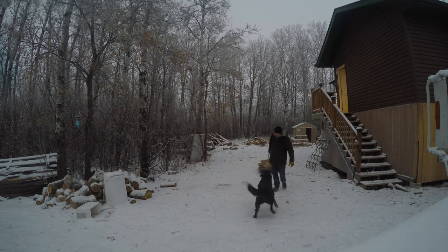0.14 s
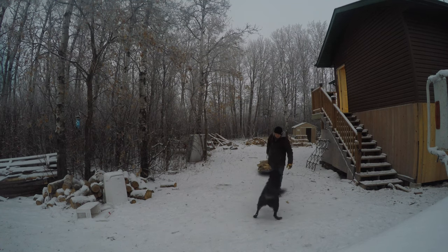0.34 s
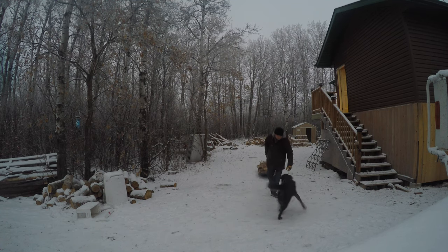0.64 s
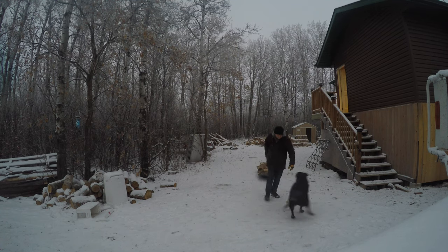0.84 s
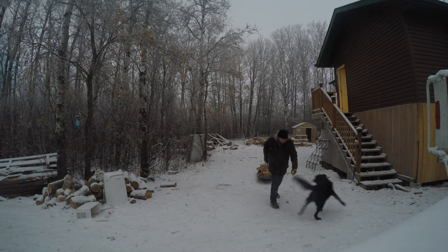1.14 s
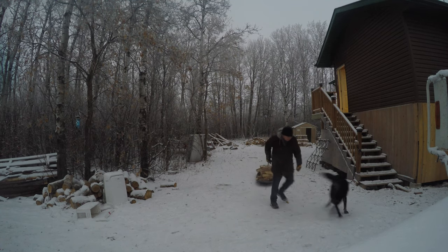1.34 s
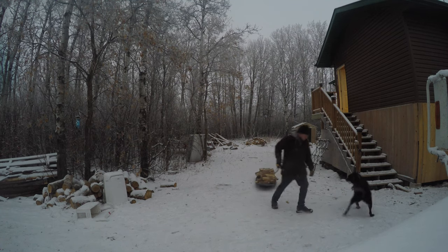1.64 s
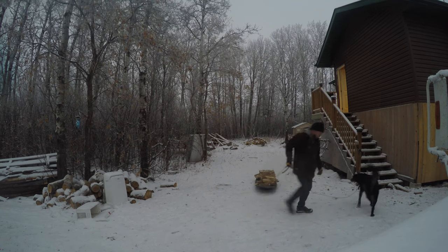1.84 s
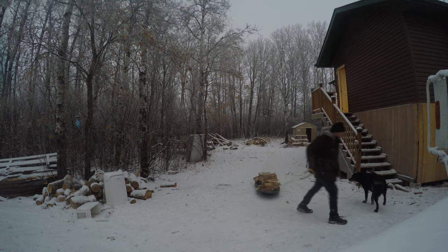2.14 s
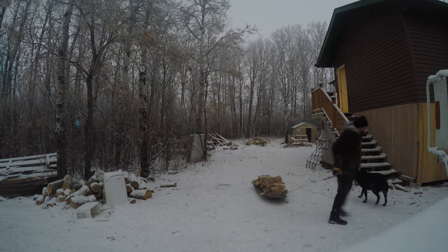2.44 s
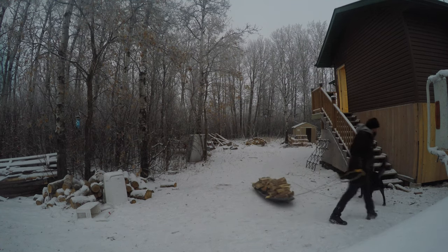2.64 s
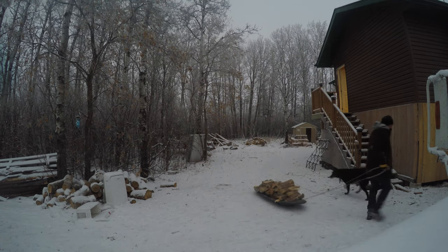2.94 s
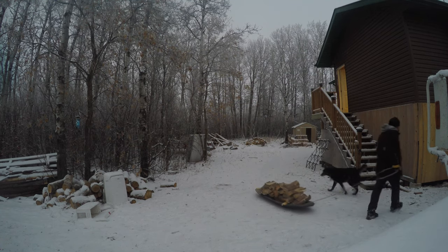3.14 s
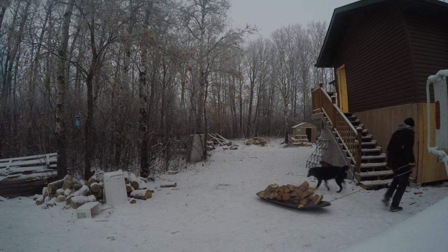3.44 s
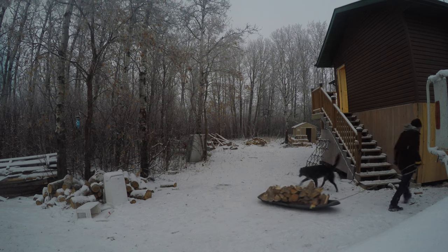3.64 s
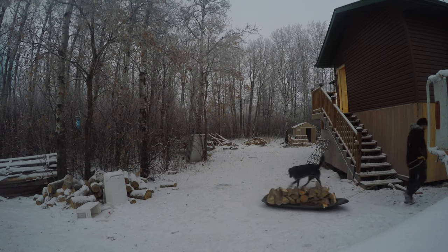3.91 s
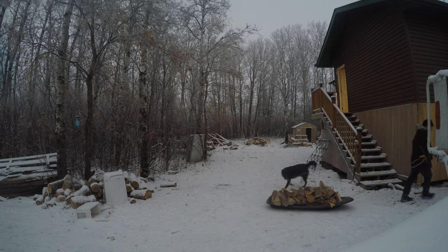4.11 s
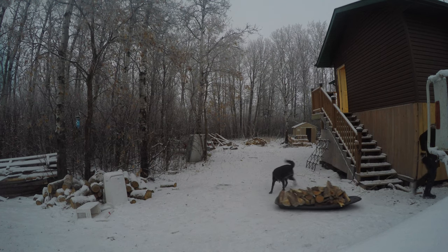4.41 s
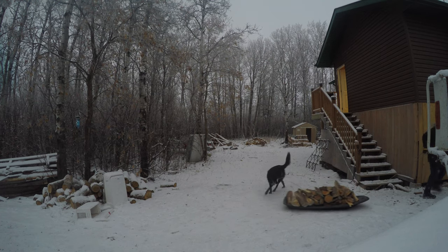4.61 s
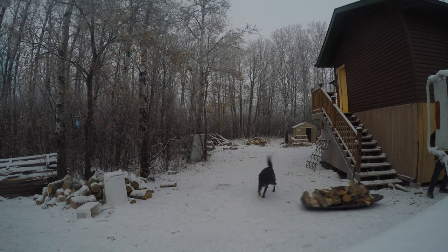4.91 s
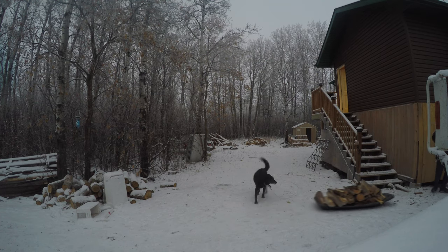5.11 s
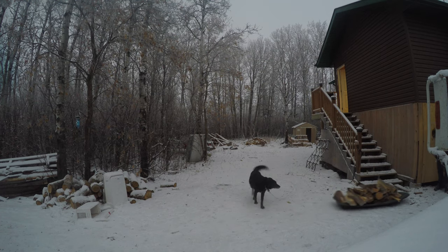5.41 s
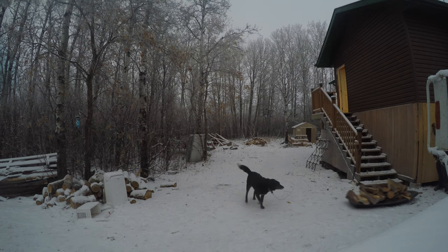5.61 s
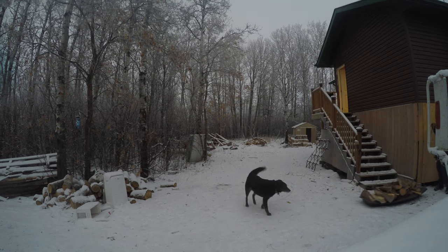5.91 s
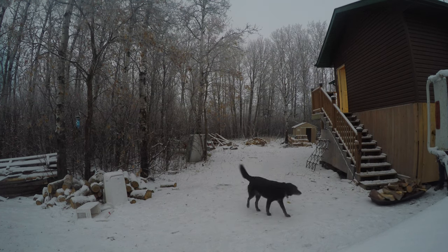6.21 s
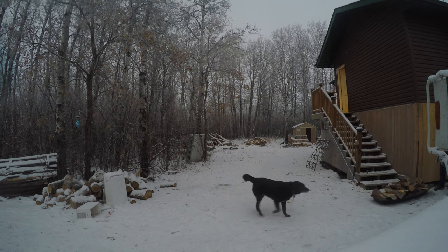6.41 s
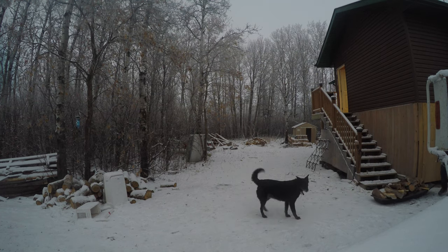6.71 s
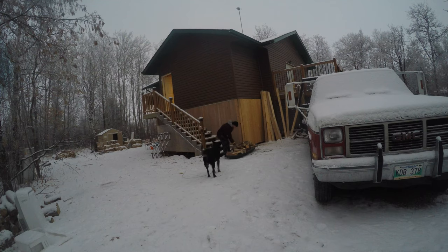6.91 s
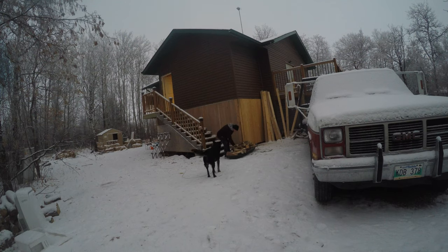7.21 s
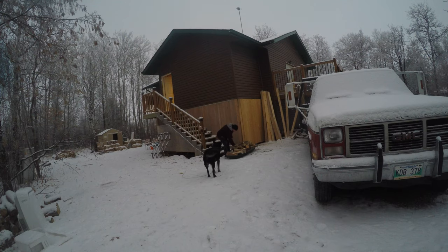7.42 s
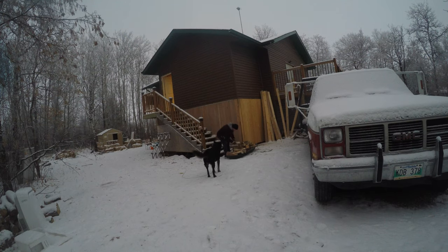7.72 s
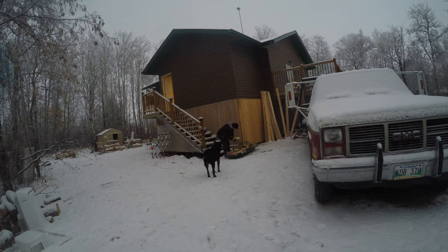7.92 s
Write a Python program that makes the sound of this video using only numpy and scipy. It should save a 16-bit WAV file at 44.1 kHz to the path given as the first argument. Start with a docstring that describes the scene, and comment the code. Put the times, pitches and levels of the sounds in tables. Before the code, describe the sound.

Light wind presses low on the microphone while a few muted thuds begin. A sled hull starts scraping over frozen snow, its hiss and rumble pulsing with each pull, logs clacking and rattling inside. It is strongest as it passes, eases slightly, then bangs several times in quick succession near the end. The hiss dies first, the drumming stops, and gusty wind flutter remains in the open yard, with slight scuffs.

```python
"""Firewood sled on snow

A plastic sled loaded with firewood is hauled over thin snow, past the listener and up to a stairway.
Snow hisses as noise under the hull, and frozen lumps drum on it as random clicks given the hull's colour.
Logs knock together, hardest as the sled pulls in: each knock is a ring, a wooden clack and a crunch.
Light wind, made of slowly varying noise, buffets the microphone; a faint echo follows the knocks.
"""
import sys
import numpy as np
from scipy import signal
from scipy.fft import rfft, irfft, next_fast_len
from scipy.io import wavfile
from scipy.ndimage import uniform_filter1d

SR = 44100
rng = np.random.default_rng(int(sys.argv[2]) if len(sys.argv) > 2 else 0)


def digitize_waveform(pressure):
    """Quantize a signal to 16-bit integers and store it at the path in sys.argv[1].

    Rows of a 2-D input are taken as channels; values are limited to [-1, 1].
    """
    field = np.atleast_2d(pressure).T
    bounded = np.clip(field, -1, 1)
    quanta = np.round(bounded * 32767).astype(np.int16)
    wavfile.write(sys.argv[1], SR, quanta)


N = 355134
TIME = np.arange(N) / SR

# All "relative" levels and spectra are adjusted further where they are used.

# still air of the yard: (frequency [Hz], relative level [dB per Hz])
AIR_SPECTRUM = [(120, -34), (200, -7.5), (326, -9.5), (427, -12), (671, -12.5), (818, -13.5), (1050, -23),
                (1690, -23), (1910, -23), (4390, -25), (9380, -31.5), (12300, -33.5), (15000, -39)]
AIR_DB = -63
# strength of the breeze: (time [s], relative rumble [dB], relative flutter of small eddies [dB])
WIND_STRENGTH = [(0.0, -42, -56.5), (0.47, -41.5, -49), (0.54, -47, -67), (0.69, -45.5, -73),
                 (1.05, -41.5, -47), (1.14, -49, -61), (1.5, -36, -48), (1.77, -46.5, -53), (2.4, -38, -52),
                 (3.11, -39, -51), (3.27, -47.5, -56), (4.06, -42.5, -72.5), (4.17, -37.5, -48.5),
                 (5.13, -38, -50.5), (6.17, -42.5, -39.5), (6.37, -50, -71), (6.43, -41, -57),
                 (6.73, -51.5, -58.5), (6.88, -54, -46), (6.96, -32, -50), (7.08, -34.5, -50.5),
                 (7.15, -39, -54.5), (7.36, -35.5, -49.5), (7.46, -33, -39), (7.55, -35.5, -49),
                 (7.62, -37, -54), (7.71, -38, -47), (7.78, -39, -39.5), (7.83, -50, -49), (7.91, -38, -51),
                 (8.03, -44.5, -62.5), (8.05, -63, -54)]
# large eddies on the microphone: (frequency [Hz], relative level [dB per Hz])
RUMBLE_SPECTRUM = [(8, -12), (18, -7), (27, 2), (45, 0), (62, -7.5), (90, -17.5), (200, -53), (600, -109)]
# small eddies on the microphone: (frequency [Hz], relative level [dB per Hz])
FLUTTER_SPECTRUM = [(35, -35.5), (70, 1), (100, -6.5), (150, -11.5), (230, -21), (400, -42.5), (1500, -81)]
# sharp gusts: (start [s], length [s], push [dB], rate of shaking [Hz], relative rasp [dB])
BUFFETS = [(4.244, 0.073, -24.5, 36.5, -67), (5.325, 0.041, -26, 45.5, -61), (5.438, 0.055, -28, 45, -75),
           (6.425, 0.057, -31, 41.6, -70), (6.804, 0.0587, -33, 48.5, -75), (7.003, 0.072, -24, 45, -55),
           (7.407, 0.0936, -20.5, 45, -41), (7.642, 0.07, -20, 37, -71), (7.746, 0.08, -34, 69, -65.5)]
# rasp of a sharp gust: (frequency [Hz], relative level [dB per Hz])
RASP_SPECTRUM = [(60, 2.5), (150, 0), (300, 0), (800, -5), (1100, -24), (3200, -26), (4200, -38),
                 (15000, -58)]

# moments when the sled is ahead, passing, and off to the side: (time [s])
BEARING_TIMES = [2.3, 4.0, 5.1]
# colour of snow and wood with the sled ahead: (frequency [Hz], relative level [dB per Hz])
COLOUR_AHEAD = [(400, -1), (1100, -1.5), (1950, -7), (2450, -2.5), (2900, -2), (3150, -6.5), (3500, -12),
                (3850, -5.5), (4350, -8.5), (4720, 0), (5000, -4), (5450, -13), (5850, -9), (6800, -11),
                (7400, -18), (8500, -21.5), (10000, -20.5), (12100, -24.5), (13200, -23), (15500, -23)]
# the same with the sled passing: (frequency [Hz], relative level [dB per Hz])
COLOUR_PASSING = [(400, 4.5), (1100, 5), (1950, -2), (2350, 2.5), (2850, 3.5), (3300, -8.5), (3950, 0),
                  (4350, -3.5), (4720, 4), (5000, -1.5), (5450, -13), (5850, -11.5), (6800, -10),
                  (7400, -16.5), (8500, -22.5), (9700, -20), (11000, -23.5), (13400, -19.5), (14200, -16),
                  (15200, -26)]
# the same with the sled off to the side: (frequency [Hz], relative level [dB per Hz])
COLOUR_ASIDE = [(400, -1), (1050, 10), (1400, 2), (1680, -2.5), (2000, 1), (2600, 2.5), (2950, -0.5),
                (3300, 2), (3650, 0.5), (4400, -2), (4850, 3.5), (5500, -3.5), (5950, -4), (7000, -10),
                (7500, -8), (8200, -15), (9200, -8), (10800, -13), (15000, -12.5)]

# pull on the sled, strongest as it passes: (time [s], relative drumming [dB], relative hiss [dB])
DRAG = [(0.0, -52, -67), (1.36, -47.5, -60), (1.62, -47, -56.5), (1.86, -46.5, -56.5), (2.0, -42.5, -58),
        (2.33, -45, -55), (2.61, -42.5, -52), (2.87, -41, -56.5), (3.05, -44.5, -54.5), (3.27, -42, -51.5),
        (3.64, -39, -54), (3.9, -42, -53), (4.23, -44, -59), (4.43, -45.5, -58.5), (4.59, -41, -57),
        (4.94, -46.5, -57), (5.5, -43, -61), (5.68, -39, -61), (5.86, -42, -62.5), (6.07, -43.5, -63.5),
        (6.25, -43.5, -64.5), (6.49, -50.5, -64), (6.6, -54, -69)]
# hull under the lumps: (frequency [Hz], relative level [dB per Hz])
HULL_SPECTRUM = [(50, -24), (110, -2.5), (190, -3), (290, 1), (400, 2), (560, 1.5), (720, 2), (850, -4.5),
                 (980, -13.5), (1150, -26.5), (1500, -28), (2400, -33.5), (5000, -82)]
# panels of the hull that take turns riding the lumps: (centre frequency [Hz])
PANELS = [130, 220, 330, 450, 580, 720, 900, 1300]
# crust breaking, before the colour of its direction: (frequency [Hz], relative level [dB per Hz])
CRUST_SPECTRUM = [(600, -2.5), (1500, 8.5), (2700, 5.5), (4600, 5), (6500, -2), (9000, 4), (15000, 1)]
# the sled surges with each tug on the rope: moment of one tug, time between tugs (both in s)
TUG_AT_S, TUG_EVERY_S = 2.427, 0.378
# high sheens in the hiss: (peak time [s], time to fade by 10 dB, sign unused [s], level [dB],
# centre at the peak [Hz], sinking [Hz per s], spread to each side [Hz])
SHEENS = [(1.6, 1.5, -76, 13670, 1, 900), (2.55, -0.75, -83, 13700, -0.5, 1000),
          (3.4, 0.15, -77, 14200, -1.5, 500), (5.1, 0.6, -73, 9330, 690, 1100)]
# groans before the last heavy bump and while slowing:
# (start [s], length [s], first pitch [Hz], last pitch [Hz], relative level [dB])
GROANS = [(5.703, 0.038, 338, 679, -33), (6.23, 0.131, 180, 166.3, -35.5)]
# hull ploughing through crust: (start [s], length [s], grind [dB], grit [dB])
SCRAPES = [(1.546, 0.019, -43, -54), (1.725, 0.034, -48.5, -54), (2.244, 0.072, -40, -59),
           (2.387, 0.017, -41, -47), (2.41, 0.061, -40, -51), (2.542, 0.0454, -39, -49),
           (2.791, 0.09, -42, -59), (3.535, 0.049, -36, -52), (3.609, 0.019, -35, -52),
           (3.753, 0.04, -40.5, -47), (3.901, 0.079, -40.5, -47.5), (4.603, 0.12, -52, -64),
           (5.553, 0.033, -42, -60.5), (5.755, 0.16, -41.5, -60), (6.393, 0.019, -45.5, -66)]
# boots scuffing snow beside the resting sled: (start [s], length [s], grind [dB], grit [dB])
SCUFFS = [(7.033, 0.06, -59, -65.5), (7.347, 0.04, -70, -67.5), (7.805, 0.03, -64, -67)]

# logs knocking in the sled: (start [s], relative thud [dB], relative clack [dB], relative crunch [dB],
# base ring time, multiplied per mode [s], hull pitch [factor],
# bass lift per octave downward [dB], log pitch [factor])
KNOCKS = [(0.300,-31,-67,-72,0.084,0.69,6,1), (0.616,-48,-55.5,-70,0.039,0.97,0,0.75),
          (1.090,-27.5,-69,-70,.04,1.015,2,0.64), (1.472,-31,-48,-59,.039,1.27,4.5,0.81),
          (1.560,-26,-59,-52,.097,1.116,-1,1), (1.567,-29,-52,-37.5,.039,1.044,-14.5,.95),
          (1.640,-28,-55,-63,0.03,1.04,-5,1), (1.664,-25.5,-56,-61,0.031,1.01,-15,0.44),
          (1.724,-25,-47,-32,.025,0.935,-1,1), (2.082,-30,-58,-65,0.044,1.07,-12,.6),
          (2.123,-28.5,-51,-52,0.035,1.06,-6,0.7), (2.229,-23,-49,-46.5,0.062,0.67,-1.5,1.05),
          (2.237,-24,-48,-58,0.033,0.552,-3,1.27), (2.433,-25,-52,-36,.047,0.83,-3,1.15),
          (2.469,-19,-50,-58,0.031,0.89,3,0.57), (2.496,-24.5,-61,-61,0.0167,1,5,1),
          (2.502,-21.5,-53,-58,0.028,1.04,2.5,0.56), (2.594,-21,-62.5,-65,0.016,1,3,0.85),
          (2.703,-23.5,-43,-39,0.064,1.1,2,0.85), (2.811,-28.5,-48,-56,0.36,1.011,-10.5,0.94),
          (2.911,-24.5,-61,-65,.04,0.98,8,1), (3.085,-32,-45,-47,.03,1.3,-3,1.1),
          (3.255,-25.5,-62,-61.5,0.045,1.06,-2,0.65), (3.27,-27,-62,-62,0.042,0.98,2,1.1),
          (3.419,-30,-45,-52,0.106,1.13,-15,1.15), (3.456,-43,-46,-41,.04,0.91,-5,1.2),
          (3.509,-25.5,-40.5,-37.5,0.12,1.03,-13.5,0.69), (3.609,-12.5,-37,-64,0.03,1.02,-7,1.08),
          (3.626,-25,-54,-64,0.019,1.03,6,.6), (3.643,-29,-60,-64,0.0186,0.92,2,1.1),
          (3.712,-25.5,-42,-36,.022,1.154,7,1.02), (3.800,-25,-43,-43,0.082,1.08,-8.5,1),
          (3.950,-24.5,-50,-47,.1,1.04,-7,1.23), (4.005,-22,-64,-67,0.14,0.86,-6,1.05),
          (4.027,-23,-58,-54,.08,0.99,0,.7), (4.061,-22,-41,-28.5,.023,0.99,-8,1.06),
          (4.621,-26,-57,-60.5,.21,0.91,9.5,1), (4.942,-25.5,-62,-67,0.095,1,6,1.15),
          (5.169,-23.5,-52,-58,.06,.82,-5,0.78), (5.479,-18.5,-51,-61,0.087,0.99,-1.5,.62),
          (5.515,-17,-43,-61,0.046,1.142,6,0.66), (5.531,-23,-51.5,-62,0.033,0.78,0,0.97),
          (5.550,-13,-36,-43,.036,1.12,0.5,.97), (5.566,-20.5,-61,-64,0.12,1.06,11.5,0.97),
          (5.638,-21.5,-64,-68,.06,.97,0,1.09), (5.740,-16.5,-68,-68,0.052,1.01,6.5,0.89),
          (5.756,-11,-38,-36,0.065,1.11,4,0.75), (5.772,-12.5,-45,-55,0.057,0.7,4,0.58),
          (5.779,-16.5,-55,-68,0.068,.92,17,1), (5.790,-21,-64,-68,0.12,.36,4,1),
          (6.035,-18.5,-51,-49,0.04,.97,1,0.89), (6.124,-21,-48,-55,0.158,1,10,0.95),
          (6.396,-25.5,-65,-68,0.024,0.92,6,0.71), (6.424,-30,-79,-74,0.086,.85,6,1),
          (6.611,-39,-78,-81,.12,1.12,8,1), (6.804,-38,-72,-74,0.055,1,8,1.04),
          (6.887,-40,-69.5,-74,0.0383,0.92,-5,1), (7.077,-35,-65,-70,0.061,1,9,1)]
# loaded hull when struck: (base frequency [Hz], relative level [dB], share of the ring time [factor])
LOAD_MODES = [(205.7, -9.5, 1.68), (270.6, -4.5, 1.24), (377, -8, 3.3), (494, -6, 1.7), (557, 6.5, 0.49),
              (702, 2.5, 2), (793.3, 1, 1.03), (893, -15.5, 0.73), (1063.4, -24.5, 2.8), (1372, -32.5, 4.7)]
# a split log: (base frequency [Hz], relative level [dB], time to fade by 60 dB [s])
LOG_MODES = [(1381, 0, 0.123), (2035, 7, 0.17), (2422, 14, 0.034), (2700, 1, 0.042), (3345, 7.5, 0.053),
             (3820, -3, 0.022)]
# wood on wood, before the colour of its direction: (frequency [Hz], relative level [dB per Hz])
CLACK_SPECTRUM = [(500, 0), (1200, 6), (2600, 5.5), (3500, -2.5), (4700, -11), (6000, 4.5), (8500, -15.5),
                  (15000, -20)]
# flexing hull: pitch (Hz), level added to the table's thud level (dB), time to fade by 60 dB (s)
FLEX_HZ, FLEX_DB, FLEX_T60 = 113, -24.5, 0.15
# top of the knocks is dulled above MUFFLE_HZ; the whole sound ends near EDGE_HZ
MUFFLE_HZ, EDGE_HZ = 9000, 15350


def amp(db):
    """Turns decibels into gain."""
    return 10 ** (np.asarray(db) / 20)


def unit(x):
    """Scales a sound to an rms (average strength) of 1."""
    return x / np.sqrt(np.mean(x ** 2) + 1e-20)


def curve(rows, column):
    """Reads gain over time from a table column in dB."""
    rows = np.asarray(rows)
    return amp(np.interp(TIME, rows[:, 0], rows[:, column]))


def add(mix, s, sound):
    """Mixes a sound in, starting at time s, and cuts off what runs past the end."""
    part = mix[max(round(s * SR), 0):][:len(sound)]
    part += sound[:len(part)]


def colour(x, spectrum):
    """Filters without any sound before its cause (minimum phase); the result has rms 1."""
    size = next_fast_len(len(x) + 8192)
    hz, db = np.transpose(spectrum)
    all_hz = abs(np.fft.fftfreq(size, 1 / SR))
    log_gain = np.log(amp(np.interp(np.log(all_hz + 1), np.log(hz), db)))
    response = np.exp(np.conj(signal.hilbert(log_gain)))[:size // 2 + 1]
    return unit(irfft(rfft(x, size) * response, size)[:len(x)])


def noise(spectrum, size=N):
    """Makes coloured noise of rms 1."""
    return colour(rng.standard_normal(size), spectrum)


def wander(rate_hz):
    """Makes a smooth random signal of rms 1, mostly slower than the given rate."""
    hz = np.fft.rfftfreq(N, 1 / SR)
    smooth = rfft(rng.standard_normal(N)) / (1 + (hz / rate_hz) ** 4)
    return unit(irfft(smooth, N))


def grains(per_s, spread_db):
    """Makes random clicks of rms 1, a few larger than the rest."""
    size = amp(spread_db * np.minimum(rng.exponential(1, N), 4))
    happens = rng.random(N) < per_s / SR
    return unit(size * rng.choice([-1, 1], N) * happens)


def ring(t, hz, db, t60, scatter=0.6):
    """Sums dying tones set off by one blow, with random pitch and phase; the peak is 1."""
    detune, phase = rng.uniform(-1.11, 1, (2, len(hz), 1))
    decay = amp(db - 60 * t / t60)
    tones = np.sin(2 * np.pi * hz * (1 + 0.04 * detune) * t + np.pi * scatter * phase)
    x = (decay * tones).sum(0)
    return x / abs(x).max()


def arriving(x):
    """Gives snow and wood a colour that turns with the direction from which they arrive."""
    out = np.zeros(N)
    for share_row, spectrum in zip(np.eye(3), (COLOUR_AHEAD, COLOUR_PASSING, COLOUR_ASIDE)):
        out += np.interp(TIME, BEARING_TIMES, share_row) * colour(x, spectrum)
    return np.std(x) * out


def still_air():
    """Steady, quiet noise of the still yard."""
    return amp(AIR_DB) * noise(AIR_SPECTRUM)


def eddies(spectrum):
    """Turbulent pressure as noise, with its strength evened out over short stretches."""
    x = noise(spectrum)
    local_power = uniform_filter1d(x ** 2, size=5000)
    return unit(x / np.sqrt(local_power + 0.043))


def wind(rumble_db=1.5, flutter_db=-1.5, gusty_db=2.5, rasp_floor=0.54):
    """Eddies press on the microphone in quick surges; sharp gusts shake it and rasp at each crest."""
    surge = unit(amp(gusty_db * wander(rate_hz=8.5)))
    rumble = eddies(RUMBLE_SPECTRUM) * curve(WIND_STRENGTH, column=1) * amp(rumble_db)
    flutter = eddies(FLUTTER_SPECTRUM) * curve(WIND_STRENGTH, column=2) * amp(flutter_db)
    out = surge * (rumble + flutter)
    for s, length, push_db, hz, rasp_db in BUFFETS:
        t = np.arange(-length / 2, length / 2, 1 / SR)
        push = np.cos(2 * np.pi * hz * t)
        rasp = noise(RASP_SPECTRUM, size=len(t)) * (rasp_floor + np.maximum(push, 0) ** 2)
        add(out, s, np.hanning(len(t)) * (amp(push_db) * push + amp(rasp_db) * rasp))
    return out


def yard(x, echo_db=-15, t60=0.53, build_up_s=0.037):
    """The house wall and the trees scatter a faint tail of fading noise."""
    t = np.arange(SR // 2) / SR
    tail = rng.standard_normal(len(t)) * amp(-60 * t / t60) * np.minimum(t / build_up_s, 1)
    return x + amp(echo_db) * signal.fftconvolve(x, tail / np.linalg.norm(tail))[:N]


def sheen():
    """Soft, high noise bands in the hiss come and go as the sled turns, drifting in pitch."""
    out = np.zeros(N)
    for s, fade_s, db, hz, sink, width_hz in SHEENS:
        since = TIME - s
        angle = 2 * np.pi * np.cumsum(hz - sink * since) / SR
        # two random signals on a cosine and a sine make a band of noise around the pitch
        band = wander(width_hz) * np.cos(angle) + wander(width_hz) * np.sin(angle)
        out += band * amp(db - 10 * (since / fade_s) ** 2)
    return out


def scrapes(skew=0.79, gritty=0.68):
    """Hull or boot ploughs through crust: a low grind and a gritty rasp swell and fade together."""
    grind, grit = np.zeros((2, N))
    for s, length, grind_db, grit_db in SCRAPES + SCUFFS:
        swell = np.sin(np.pi * np.linspace(0, 1, int(length * SR)) ** skew)
        add(grind, s, amp(grind_db) * swell)
        add(grit, s, amp(grit_db) * swell)
    crystals = rng.standard_normal(N) + gritty * grains(per_s=400, spread_db=2.5)
    return grind * noise(HULL_SPECTRUM) + grit * arriving(colour(crystals, CRUST_SPECTRUM))


def groans(rough=0.63, jitter=0.066):
    """Plastic sticks and slips on packed snow: a gliding tone, uneven in pitch and strength."""
    out = np.zeros(N)
    waver = 1 + jitter * wander(rate_hz=150)
    for s, length, first_hz, last_hz, db in GROANS:
        hz = np.linspace(first_hz, last_hz, int(length * SR))
        turns = np.cumsum(hz * waver[round(s * SR):][:len(hz)]) / SR
        add(out, s, amp(db) * np.hanning(len(hz)) * np.sin(2 * np.pi * turns))
    return out * (1 + rough * wander(rate_hz=53))


def jostle(jostle_db=-14, crackle_db=-7, crackle_t60=0.015, t60=0.31):
    """The load taps and the crust crackles at random, as strongly as the drag allows."""
    t = np.arange(SR // 8) / SR
    hz, db, share = np.transpose(LOAD_MODES)[:, :, None]
    taps = np.zeros(N)
    for _ in range(6):
        hits = grains(per_s=5, spread_db=3.0)
        tap = ring(t, hz * rng.uniform(0.842, 1.133), db, t60 * share)
        taps += signal.oaconvolve(hits, tap)[:N]
    breaks = abs(grains(per_s=93, spread_db=0.3))
    snaps = signal.oaconvolve(breaks, amp(-60 * t / crackle_t60))[:N]
    crackle = arriving(colour(snaps * rng.standard_normal(N), CRUST_SPECTRUM))
    taps = amp(jostle_db) * unit(taps) * curve(DRAG, column=1)
    return taps, amp(crackle_db) * crackle * curve(DRAG, column=2)


def drumming(patchy_db=2.0):
    """Lumps strike the hull; each panel swells and fades as the load shifts onto it."""
    spectrum = rfft(colour(grains(per_s=1100, spread_db=1.5), HULL_SPECTRUM))
    hz = np.fft.rfftfreq(N, 1 / SR)
    swells = np.array([amp(patchy_db * wander(rate_hz=12.3)) for _ in PANELS])
    swells = swells / np.sqrt(np.mean(swells ** 2, axis=0))  # the whole weight stays the same
    out = np.zeros(N)
    for swell, row in zip(swells, np.eye(len(PANELS))):
        out += swell * irfft(spectrum * np.interp(hz, PANELS, row), N)
    return unit(out)


def sled(hiss_db=1.5, hiss_judder_db=1.41, crunch=0.35, drum_tug_db=0.48, hiss_tug_db=0.56):
    """Lumps drum on the hull and crystals shear under it; both follow the tugs, the hiss also the grip."""
    grip = wander(rate_hz=11.7)
    tug = np.cos(2 * np.pi * (TIME - TUG_AT_S) / TUG_EVERY_S)
    drum = drumming() * amp(drum_tug_db * tug) * curve(DRAG, column=1)
    shear = unit(rng.standard_normal(N) + crunch * grains(per_s=480, spread_db=3.0))
    hiss_gain = amp(hiss_db + hiss_judder_db * grip + hiss_tug_db * tug)
    hiss = arriving(shear) * hiss_gain * curve(DRAG, column=2)
    taps, crackle = jostle()
    # the sled slows to rest: the hiss dies first
    on_hull = (drum + taps) * np.interp(TIME, [6.62, 6.76], [1, 0])
    on_snow = (hiss + crackle) * np.interp(TIME, [6.1, 6.6], [1, 0])
    return on_hull + on_snow + groans() + scrapes()


def flex():
    """The whole hull bounces under each knock: a low, short tone."""
    out, t = np.zeros(N), np.arange(SR // 4) / SR
    bounce = np.sin(2 * np.pi * FLEX_HZ * t) * amp(-60 * t / FLEX_T60)
    for s, thud_db, *_ in KNOCKS:
        add(out, s, amp(thud_db + FLEX_DB) * bounce)
    return out


def logs(thud_db=-5.0, clack_db=4, clack_t60=0.0084, crunch_share=0.86, woody=0.823, rise_s=0.00078,
         chatter=0.16, chatter_t60=0.18, bark_db=-19):
    """A knock clacks the wood, rings the hull, crunches the snow and chatters as the pile settles."""
    thuds, cracks = np.zeros((2, N))
    t = np.arange(SR // 3) / SR
    hz, db, share = np.transpose(LOAD_MODES)[:, :, None]
    log_hz, log_db, log_t60 = np.transpose(LOG_MODES)[:, :, None]
    wood = noise(CLACK_SPECTRUM, size=N + len(t))
    # the pile settles in small separate taps, and the crust breaks grain by grain
    rattle = np.pad(colour(grains(per_s=700, spread_db=1.4), HULL_SPECTRUM), (0, len(t)))
    snow = np.pad(colour(grains(per_s=6000, spread_db=4.5), CRUST_SPECTRUM), (0, len(t)))
    rise = 1 - np.exp(-t / rise_s)
    settling = amp(-60 * t / chatter_t60)
    # bark keeps rubbing on bark after the first contact
    rub_fade = 0.9 * amp(-60 * t / clack_t60) + amp(bark_db) * np.sqrt(settling)
    for s, peak_db, wood_db, snow_db, t60, pitch, depth_db, log_pitch in KNOCKS:
        now = round(s * SR) + np.arange(len(t))
        thud = ring(t, hz * pitch, db - depth_db * np.log2(hz), t60 * share) * rise
        thud = thud / abs(thud).max() + chatter * rattle[now] * settling * rise
        log_ring = ring(t, log_hz * log_pitch, log_db, log_t60, scatter=0.22)
        clack = wood[now] * rub_fade + woody * log_ring
        crunch = snow[now] * amp(snow_db - 60 * t / (crunch_share * t60)) * rise
        add(thuds, s, amp(peak_db + thud_db) * thud)
        add(cracks, s, amp(wood_db + clack_db) * clack + crunch)
    return thuds + arriving(cracks)


def scene():
    """Adds air, wind, sled and load; the pile and the snow dull the top of the knocks."""
    muffle = signal.butter(2, MUFFLE_HZ, fs=SR, output="sos")
    knocks = signal.sosfilt(muffle, logs() + flex())
    return (still_air() + wind() + sheen() + sled() + yard(knocks))[None]


def record(dry):
    """Removes the treble above the band edge."""
    low_pass = signal.firwin(511, EDGE_HZ, window=("kaiser", 9), fs=SR)
    return signal.oaconvolve(dry, low_pass[None], "same")


dry = scene()
out = record(dry)
digitize_waveform(out)
```